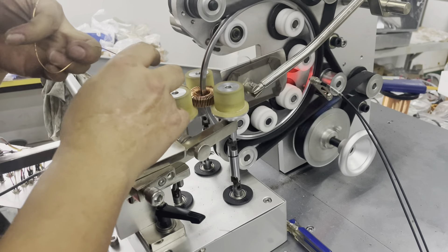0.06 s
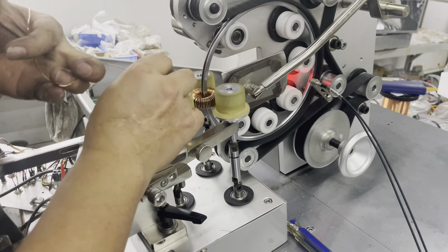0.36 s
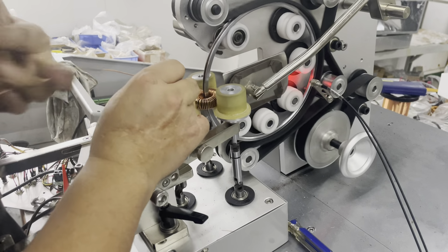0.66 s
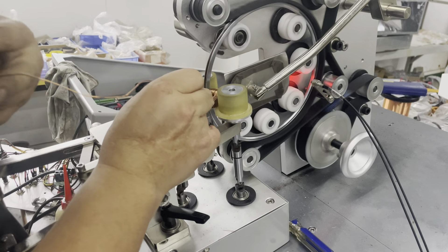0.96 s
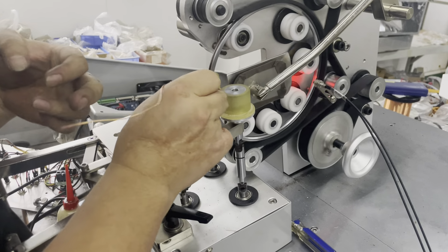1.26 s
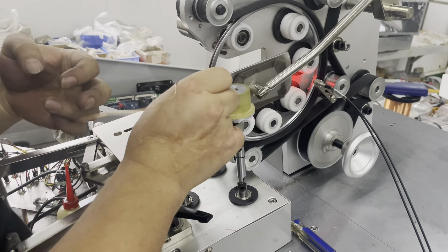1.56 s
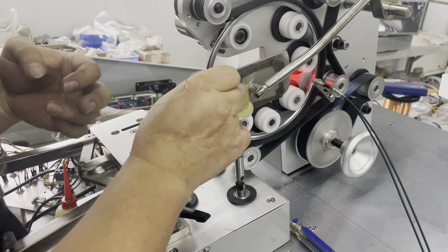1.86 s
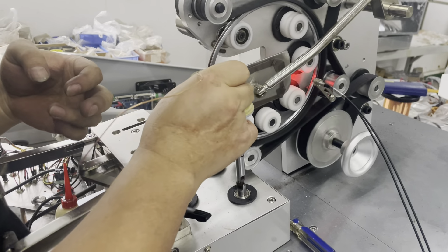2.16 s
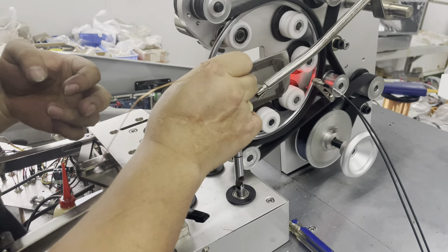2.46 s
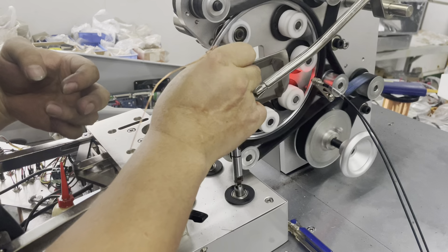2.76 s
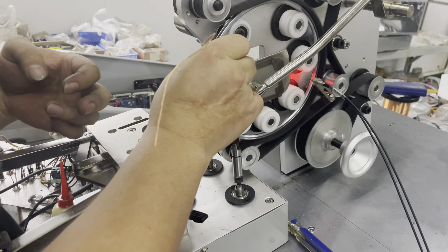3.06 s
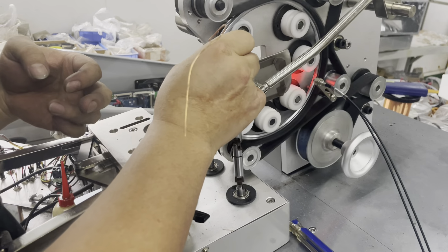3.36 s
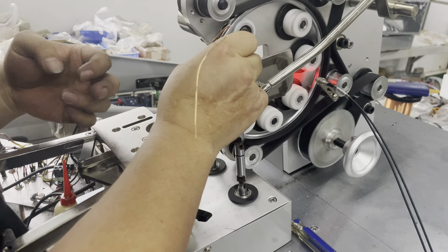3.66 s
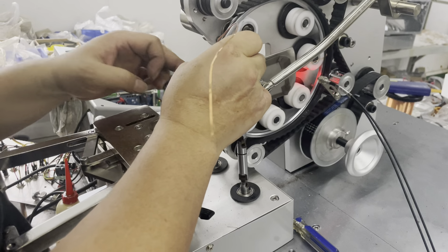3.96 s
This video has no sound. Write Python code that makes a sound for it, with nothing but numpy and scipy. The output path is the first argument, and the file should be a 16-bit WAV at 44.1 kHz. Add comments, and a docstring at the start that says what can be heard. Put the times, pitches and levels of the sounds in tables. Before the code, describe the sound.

A wire winding machine whines and rattles with fast rhythmic snaps, then stops.

```python
"""A toroid winding machine in a workshop, close to a stereo microphone, already at full speed.
Its toothed drive whines and rattles the steel frame. Six times a second the shuttle ring pulls a turn
of wire tight with a snap, a knock, a groan and a thump, and a wheel rasps about half as often.
At 3.5 s the machine stops; slack wire ticks on a steel guide and a low rumble remains in the room."""
import sys
import numpy as np
from scipy import signal
from scipy.fft import rfft, irfft, next_fast_len
from scipy.io import wavfile
from scipy.ndimage import map_coordinates

SR = 44100
rng = np.random.default_rng(int(sys.argv[2]) if len(sys.argv) > 2 else 0)


def pcm_store(signal):
    """Save signal as 16-bit PCM."""
    levels = np.round(np.clip(np.atleast_2d(signal), -1, 1) * 32767)
    wavfile.write(sys.argv[1], SR, levels.astype(np.int16).T)


N = 176400


def amp(db):
    return 10 ** (np.asarray(db) / 20)


def unit(x):
    return x / np.sqrt(np.mean(x ** 2) + 1e-20)


def clock():
    return np.arange(N) / SR


def noise():
    return rng.standard_normal((2, N))


def along(points, hz):
    """(Hz, value) points read on a log frequency axis."""
    freqs, values = np.transpose(points)
    return np.interp(np.log(hz + 1), np.log(freqs + 1), values)


def level(points):
    """Gain per sample from (s, dB) points."""
    return amp(np.interp(clock(), *np.transpose(points)))


def wobble(rate):
    """A smooth random curve, rate knots a second."""
    return map_coordinates(rng.standard_normal(2000), [clock() * rate], mode="wrap")


def swell(s, width):
    """A bell-shaped rise and fall around time s."""
    return np.exp(-.5 * np.minimum(((clock() - s) / width) ** 2, 100))


def strike(s, decay, attack=0.00052):
    """A quick start at time s that dies away."""
    age = np.maximum(clock() - s, 0)
    return (1 - np.exp(-age / attack)) * np.exp(-np.minimum(age / decay, 50))


def filtered(x, response):
    """x through a complex frequency response."""
    size = next_fast_len(N + SR // 2)
    return irfft(rfft(x, size) * response(np.fft.rfftfreq(size, 1 / SR)), size)[..., :N]


def resonate(x, modes):
    """x through (Hz, width Hz, dB) resonances."""
    return filtered(x, lambda f: sum(amp(db) * 1j * f * width / (hz * hz - f * f + 1j * f * width)
                                     for hz, width, db in modes))


def colour(x, spectrum):
    """x shaped by (Hz, dB) points."""
    return filtered(x, lambda hz: amp(along(spectrum, hz)))


# how alike the microphone's two sides are: (frequency [Hz], likeness [correlation, clipped to +-1])
STEREO_LIKENESS = [(100, 0.95), (350, 0.93), (600, 0.14), (1100, 0.7), (2500, 0.76), (5000, 0.3),
                   (7000, 0.38), (8600, -1.45), (10000, -0.65), (11500, 0.2), (13000, 0.98)]

def spread(pair):
    """Two unrelated signals become left and right at the microphone, rms 1."""
    def mid_side_gains(hz):
        angle = np.arccos(np.clip(along(STEREO_LIKENESS, hz), -1, 1)) / 2
        return np.array([np.cos(angle), np.sin(angle)])
    mid, side = filtered(pair, mid_side_gains)
    return unit(np.array([mid + side, mid - side]))


# the workshop's reverberation: (frequency [Hz], time to fall 60 dB [s])
ROOM_DECAY = [(200, 1), (2000, 0.35), (6000, 0.49), (14000, 0.067)]

def room(x):
    """What the workshop's walls send back: a noise tail, longest in the bass."""
    hz, t, spectra = signal.stft(rng.standard_normal((2, SR // 2)), SR, nperseg=256)
    tail = signal.istft(spectra * amp(-60 * t / along(ROOM_DECAY, hz)[:, None]), SR, nperseg=256)[1]
    return signal.fftconvolve(x, tail / np.linalg.norm(tail[0]), axes=1)[:, :N]


TOOTH_HZ, PULLEY_HZ, WARBLE_HZ = 369.1, 224.9, 18.8
LAG_WIDTH_S, RELAPSE_S, CATCH_UP_S, CATCH_UP_DB = 0.0081, 0.0471, 0.012, 4.5

def lag():
    """Radians the teeth fall behind: each pull holds them back, then again more weakly."""
    return sum(swell(s, LAG_WIDTH_S) + 0.29 * swell(s + RELAPSE_S, LAG_WIDTH_S) for s, *_ in TURNS)


# the drive running, then stopping: (time [s], level [dB])
DRIVE_LEVEL = [(0, -2), (3.49, -3), (3.52, -3.5), (3.56, -13), (3.63, -24.5), (3.8, -23), (4, -39)]
# the whine: (multiple of the tooth rate, level [dB], left minus right [dB], phase waver [rad])
TOOTH_HARMONICS = [(1, -28, 2, .1), (2, -31.5, -9, .08), (3, -31.5, 6, .9), (4, -38.5, 4, .6),
                   (7, -45, 3, .9), (8, -46, 3, .9), (9, -37.5, 5, .55)]

def whine(flutter_db=1.52):
    """Tooth harmonics and one pulley tone; the overtones dip at each pull and swell as it catches up."""
    t = clock()
    tooth_phase = 2 * np.pi * TOOTH_HZ * t - lag()
    surge = sum(swell(s + CATCH_UP_S, LAG_WIDTH_S) - swell(s - LAG_WIDTH_S, LAG_WIDTH_S)
                for s, *_ in TURNS)
    tones = amp(-37 + flutter_db * wobble(24)) * np.sin(2 * np.pi * PULLEY_HZ * t)
    for k, db, pan_db, waver_rad in TOOTH_HARMONICS:
        waver = 0.57 * wobble(30) + np.sin(2 * np.pi * WARBLE_HZ * t + wobble(4.99))
        phase = k * tooth_phase + waver_rad * waver + (k - 1) * rng.uniform(0, 2 * np.pi)
        gain = amp(db + (k > 1) * CATCH_UP_DB * surge + flutter_db * wobble(13))
        tones = tones + amp([[pan_db / 2], [-pan_db / 2]]) * gain * np.cos(phase)
    return np.sqrt(2) * tones * level(DRIVE_LEVEL)


# resonances of the housing: (frequency [Hz], width [Hz], relative level [dB])
HOUSING_MODES = [(347, 29.5, -1.5), (753, 28, -12.5), (1128.6, 27.5, -5.5), (1484, 20, -16),
                 (659, 25, -12.5), (302, 17, -13.5)]
# low noise of the machine's body: (frequency [Hz], relative level [dB])
BODY_SPECTRUM = [(15, -60), (25, -34), (75, 5), (167, -24), (221, 7), (285, -20), (367, 9.5), (466, 1),
                 (600, -35), (780, -32), (1320, -120)]

def whirr(repeat_share=0.33):
    """The shuttle ring rolls over the same unevenness every turn and shakes the housing."""
    times = [s for s, *_ in TURNS]
    starts = np.zeros((1, N))
    starts[0, [int(s * SR) for s in times]] = 1
    one_turn = noise()[:, :int(np.mean(np.diff(times)) * SR)]
    repeating = unit(signal.fftconvolve(starts, one_turn, axes=1)[:, :N])
    shake = np.sqrt(repeat_share) * repeating + np.sqrt(1 - repeat_share) * noise()
    housing = amp(-31) * spread(resonate(shake * level(DRIVE_LEVEL), HOUSING_MODES))
    body = amp(-35.5) * spread(colour(noise(), BODY_SPECTRUM)) * level(DRIVE_LEVEL)
    return housing + body


# resonances of the shuttle ring: (frequency [Hz], width [Hz], relative level [dB])
SHUTTLE_MODES = [(5163, 19, 1.5), (5430, 40, -9), (5890, 80, -7.5), (6350, 55, -2.5)]
# strength of its whistle: (time [s], level [dB])
WHISTLE_LEVEL = [(0, -37), (1.25, -38), (1.5, -34.5), (2.5, -33), (3.4, -34)]

def whistle(force, sway_rad=0.35):
    """The shuttle ring whistles under the clicking teeth; the pitch wanders with its speed."""
    ringing = spread(resonate(force, SHUTTLE_MODES))
    swayed_time = clock() + (sway_rad * wobble(26) - lag()) / (2 * np.pi * TOOTH_HZ)
    return level(WHISTLE_LEVEL) * np.array([map_coordinates(side, [swayed_time * SR]) for side in ringing])


# unevenness of the gears: (rate [cycles per tooth], depth [dB])
GEAR_UNEVENNESS = [(.3, 2.6), (.4, 1.3), (.1, .8)]

def tooth_force(click_s=0.00032, grind=0.46, load_db=2):
    """Every tooth clicks, unevenly, over a steady grind; both grow louder under each pull."""
    teeth = TOOTH_HZ * clock()
    uneven_db = sum(db * np.cos(2 * np.pi * rate * np.floor(teeth)) for rate, db in GEAR_UNEVENNESS)
    clicks = amp(uneven_db) * np.exp(-(teeth % 1) / TOOTH_HZ / click_s)
    load = sum(swell(s, width=0.015) for s, *_ in TURNS)
    force = np.hypot(clicks, grind) * noise() * amp(load_db * load + 0.6 * wobble(40))
    force *= level(DRIVE_LEVEL)
    return force + amp(-13.5) * room(force)


# broad response of the steel frame: (frequency [Hz], relative level [dB])
FRAME_SPECTRUM = [(260,-23), (450,-14), (596,-14), (745,-2.5), (826,-14), (916,-13.5), (1110,-5),
                  (1330,-11.5), (1470,-11.5), (1830,-12.5), (2010,-18), (2290,-10.5), (3090,-13),
                  (3270,-13), (4100,-10), (4810,-14.5), (5260,-13), (5580,-23.5), (6370,-19.5), (7500,-25),
                  (8500,-24), (10200,-25.5), (12800,-29), (14000,-26), (15500,-37)]
# its resonances: (frequency [Hz], width [Hz], relative level [dB])
FRAME_MODES = [(1866, 55, 0.5), (2304, 140, 2.5), (2597, 73, 3.5), (2960, 66, -8), (3290, 140, 0)]

def rattle(force):
    """The teeth set the steel frame clattering and ringing, close to the microphone."""
    clatter = amp(-25) * spread(colour(force, FRAME_SPECTRUM))
    return clatter + amp(-37.5) * spread(resonate(force, FRAME_MODES))


# the room's noise and its rumble: (frequency [Hz], relative level [dB])
ROOM_TONE_SPECTRUM = [(59, -28), (100, -4), (227, -4), (252, -8.5), (345, -6.5), (513, -11.5), (2690, -26),
                      (9460, -55), (10100, -38), (15000, -52)]
RUMBLE_SPECTRUM = [(20, -29), (31, 0), (40, 2.5), (80, 9), (130, -12), (210, 3), (350, -12), (700, -44)]
# how each rises and falls: (time [s], level [dB])
ROOM_TONE_LEVEL = [(0, -39), (3.62, -35.5), (3.85, -34.5), (3.9, -41.5), (4, -39.5)]
RUMBLE_LEVEL = [(0, -46), (3.05, -67), (3.16, -32), (3.28, -46), (3.68, -40.5), (3.74, -35), (3.82, -33.5),
                (3.91, -40), (3.97, -31.5)]

def workshop():
    """Room tone behind the machine, and a low rumble that comes up towards the end."""
    room_tone = level(ROOM_TONE_LEVEL) * spread(colour(noise(), ROOM_TONE_SPECTRUM))
    return room_tone + level(RUMBLE_LEVEL) * spread(colour(noise(), RUMBLE_SPECTRUM))


# each turn of wire pulled tight: (time [s], groan [dB], thump [dB], relative knock level [dB])
TURNS = [(0.013, -26, -36, -34), (0.153, -37, -33, -29), (0.307, -17.5, -36.5, -34),
         (0.473, -24, -32.5, -29.5), (0.627, -19.5, -34, -30.0), (0.785, -17, -34.5, -31.5),
         (0.945, -16, -35, -34), (1.108, -19, -33.5, -31.5), (1.259, -19.5, -33.0, -28.5),
         (1.425, -22, -32, -31.5), (1.58, -23, -35.5, -36), (1.731, -16, -35, -30),
         (1.902, -17.5, -35, -29.5), (2.059, -16, -42.0, -45), (2.22, -20.5, -40, -34),
         (2.372, -20, -38.5, -29.5), (2.529, -24.5, -39, -43.0), (2.692, -22, -42, -36.0),
         (2.852, -17, -38.5, -36), (3.016, -25.5, -37.5, -34), (3.161, -19, -34.5, -38),
         (3.326, -19, -36, -44), (3.478, -18, -36, -35)]
# the knocked housing: (frequency [Hz], relative level [dB], time to fall 60 dB [s])
KNOCK_MODES = [(148.4, -3, 0.16), (290, -1.5, 0.14), (324, -2, .08), (433, 4.5, 0.058), (525, 1, .05)]
# the dull noise in each knock: (frequency [Hz], relative level [dB])
THUD_SPECTRUM = [(60, -23), (140, -12), (400, 16), (600, -11), (900, -13), (1400, -7), (2500, -27)]
GROAN_SAG_HZ, THUMP_HZ, THUMP_DELAY_S = 4.5, 82.9, 0.043
KNOCK_LEAD_S, KNOCK_RISE_S = 0.01408, 0.0058

def pulls():
    """Each turn loads the drive: the housing knocks, the tooth tone swells and sags, the base thumps."""
    t, tones, thuds = clock(), np.zeros(N), np.zeros(N)
    age = np.arange(SR // 5) / SR
    for s, groan_db, thump_db, knock_db in TURNS:
        sag_hz = rng.normal(GROAN_SAG_HZ, 5)
        groan = np.cos(2 * np.pi * (TOOTH_HZ * t - sag_hz * (t - s)))
        tones += amp(groan_db) * swell(s, width=0.01) * groan
        thump = np.sqrt(2) * np.cos(2 * np.pi * THUMP_HZ * rng.normal(1, 0.083) * (t - s))
        tones += amp(thump_db) * swell(s + THUMP_DELAY_S, width=0.036) * thump
        knock = np.zeros(len(age))
        for hz, db, t60 in KNOCK_MODES:
            scatter = rng.standard_normal()  # a louder mode is also slightly sharper
            mode = np.sin(2 * np.pi * hz * (1 + 0.037 * scatter) * age)
            knock += amp(db + 2 * scatter - 60 * age / t60) * mode
        start = max(0, int((s - KNOCK_LEAD_S) * SR))
        tones[start:start + len(age)] += amp(knock_db + 8) * knock * (1 - np.exp(-age / KNOCK_RISE_S))
        thuds += amp(knock_db - 2) * swell(s, width=0.0077)
    return tones + thuds * spread(colour(noise(), THUD_SPECTRUM))


# the wire leaving the ring: (time [s], relative level [dB])
WIRE_SNAPS = [(0.0054, -47), (0.124, -24), (0.2953, -24.5), (0.454, -24.5), (0.612, -27), (0.76, -27),
              (0.92, -27), (1.077, -26.5), (1.2374, -26), (1.3975, -25), (1.552, -28), (1.721, -25.5),
              (1.869, -27.5), (2.0428, -29), (2.189, -25), (2.351, -23), (2.506, -25), (2.6766, -29),
              (2.8214, -25), (2.9807, -24.5), (3.1412, -25.5), (3.309, -30), (3.46, -22.5)]
# the wire's bright noise: (frequency [Hz], relative level [dB])
WIRE_SPECTRUM = [(7000, -20), (8400, 12), (9300, -1), (10450, 6), (11300, -22), (12450, 10), (12900, -8),
                 (14500, -12), (15000, 1), (15230, 8.5), (15500, 1), (15900, -4.5)]
SNAP_DECAY_S, SLIP_LEAD_S, REBOUND_S = 0.013, 0.044, 0.0138

def snaps():
    """The wire slips a little, then leaves the ring with a bright snap and a rebound."""
    bursts = np.zeros(N)
    for s, db in WIRE_SNAPS:
        slip = amp(-5.5) * strike(s - SLIP_LEAD_S * rng.lognormal(0, 0.17), SNAP_DECAY_S)
        rebound = amp(rng.normal(-9.5, 2)) * strike(s + REBOUND_S * rng.lognormal(0, 0.15), SNAP_DECAY_S)
        bursts += amp(db - 1) * (slip + strike(s, SNAP_DECAY_S) + rebound)
    return bursts * spread(colour(noise(), WIRE_SPECTRUM))


# resonances of the wire: (frequency [Hz], width [Hz], relative level [dB])
WIRE_MODES = [(6930, 160, -15), (7380, 130, -10.5), (8410, 58, 5.5), (10260, 60, -16), (15210, 70, -11)]

def wire_ringing():
    """The wire rings thinly after every snap and tick, and faintly as it rubs along."""
    rubbing = amp(-44) * level(DRIVE_LEVEL)
    plucks = sum(amp(db) * strike(s, SNAP_DECAY_S) for s, db in WIRE_SNAPS + WIRE_TICKS)
    return amp(-47) * spread(resonate((rubbing + plucks) * noise(), WIRE_MODES))


# each rub of the wheel: (time [s], level [dB])
WHEEL_RUBS = [(.019,-46), (.141,-22), (.334,-30), (.437,-25), (.746,-24), (.944,-37), (1.044,-25.5),
              (1.353,-26.5), (1.656,-26), (1.74,-29), (1.962,-25.5), (2.24,-25), (2.566,-27.5), (2.857,-27),
              (3.159,-25.5), (3.485,-23.5)]
# its rasp: (frequency [Hz], relative level [dB])
RASP_SPECTRUM = [(1000, -34), (2000, -1), (2600, 5.5), (3500, 6.5), (4300, 4), (5200, -21), (8000, -40)]

def wheel_rasp():
    """A wheel rubs as it goes round, about three times a second, chopped by the teeth."""
    strokes = sum(amp(db) * swell(s, width=0.016) for s, db in WHEEL_RUBS)
    chop = 1 + .5 * np.cos(2 * np.pi * TOOTH_HZ * clock())
    return strokes * spread(colour(chop * noise(), RASP_SPECTRUM))


# light metal ticks after the stop: (time [s], relative level [dB])
WIRE_TICKS = [(3.657, -46), (3.724, -43), (3.735, -42), (3.763, -44), (3.788, -29), (3.813, -29),
              (3.822, -37), (3.853, -43), (3.862, -44)]
# the guide rings until the wire settles on it: (time [s], damped at [s], level [dB])
GUIDE_RINGS = [(3.788, 3.812, -41), (3.823, 3.864, -40.5)]
GUIDE_HZ, GUIDE_T60_S, DAMPING_S, TICK_RISE_S = 2630, 0.85, 0.005, 0.0015

def guide_ticks():
    """Slack wire brushes a steel guide, which rings briefly twice."""
    t = clock()
    touches = sum(amp(db) * swell(s + TICK_RISE_S, TICK_RISE_S) for s, db in WIRE_TICKS)
    taps = touches * (amp(-5.5) * spread(colour(noise(), WIRE_SPECTRUM)) + amp(-6) * spread(noise()))
    envelope = np.zeros(N)
    for s, damped_at, db in GUIDE_RINGS:
        damping = np.exp(-np.maximum(t - damped_at, 0) / DAMPING_S)
        envelope += amp(db) * strike(s, GUIDE_T60_S / np.log(1000)) * damping
    ringing = envelope * np.sin(2 * np.pi * GUIDE_HZ * t + .3 * wobble(150))
    return taps + amp(-7) * room(taps) + ringing


def scene():
    """The machine up close, with the workshop behind it."""
    housing, force = whirr(), tooth_force()
    drive = whine() + housing + amp(-15) * room(housing) + whistle(force) + rattle(force)
    return drive + workshop() + pulls() + snaps() + wire_ringing() + wheel_rasp() + guide_ticks()


def record(dry, top_hz=15850):
    """The microphone keeps nothing above its band limit."""
    return filtered(dry, lambda hz: hz < top_hz)


dry = scene()
out = record(dry)
pcm_store(out)
```